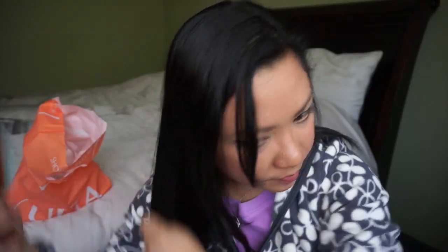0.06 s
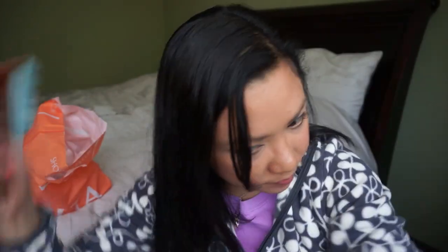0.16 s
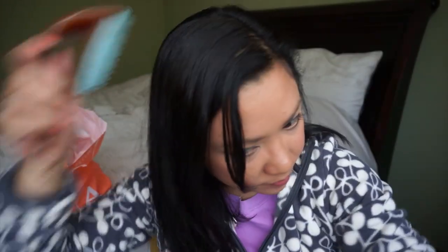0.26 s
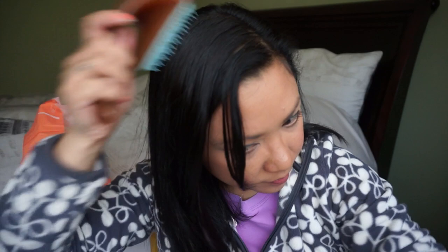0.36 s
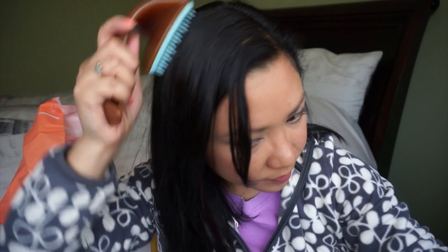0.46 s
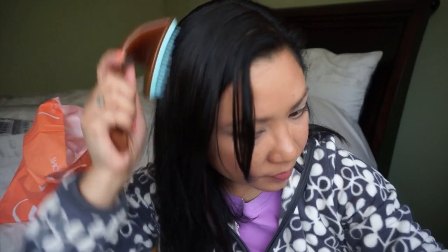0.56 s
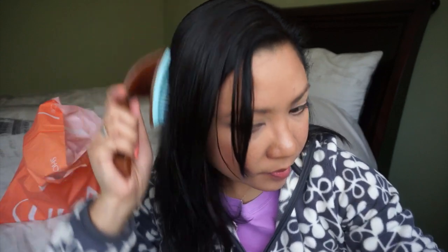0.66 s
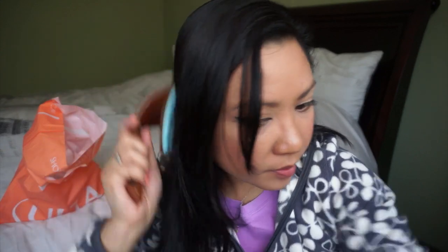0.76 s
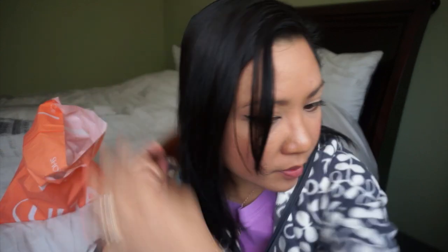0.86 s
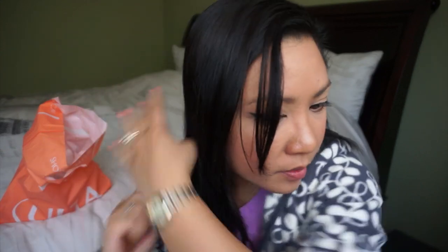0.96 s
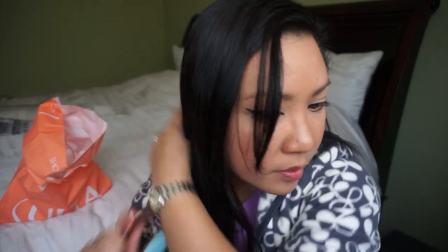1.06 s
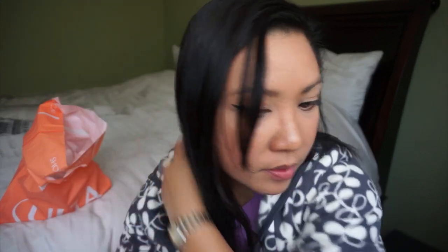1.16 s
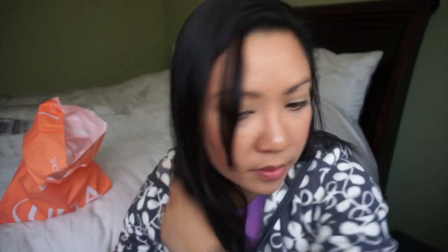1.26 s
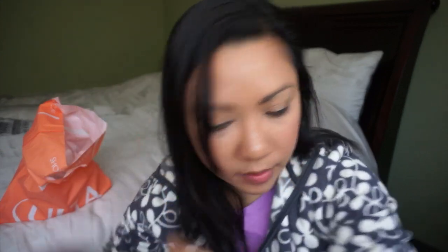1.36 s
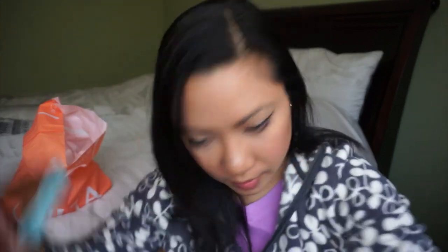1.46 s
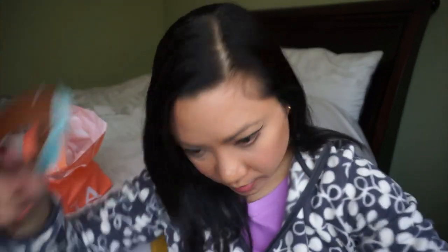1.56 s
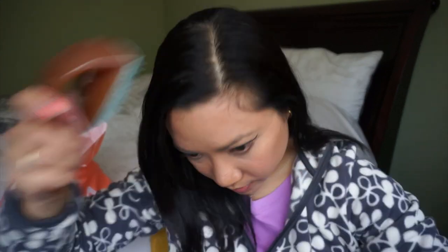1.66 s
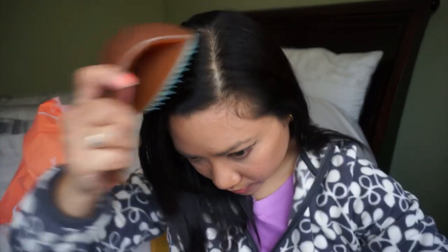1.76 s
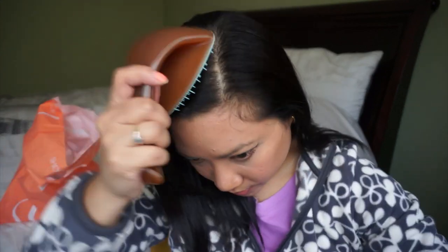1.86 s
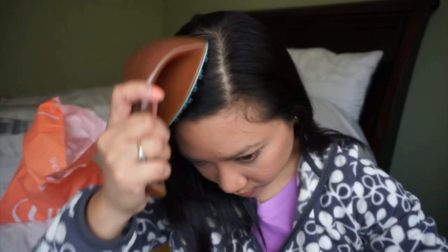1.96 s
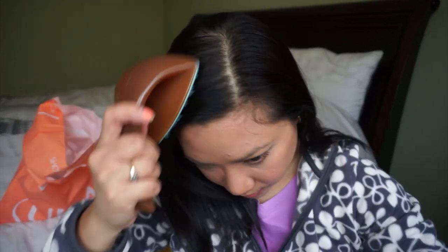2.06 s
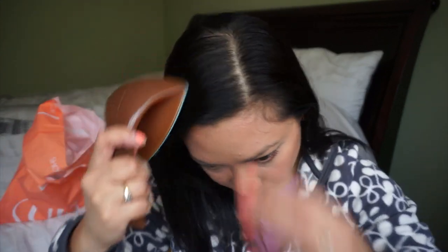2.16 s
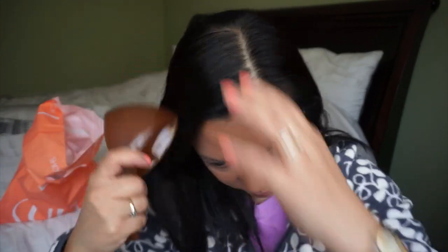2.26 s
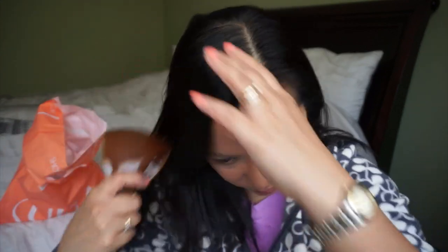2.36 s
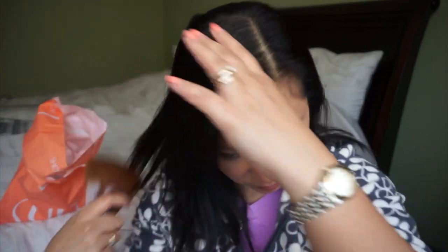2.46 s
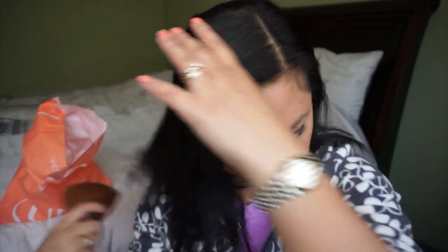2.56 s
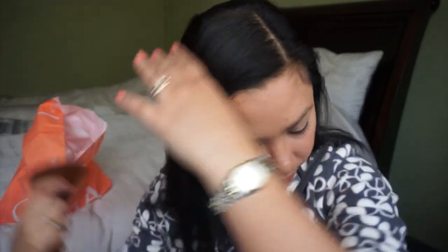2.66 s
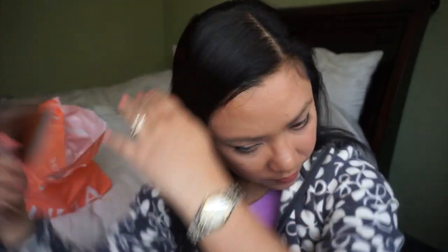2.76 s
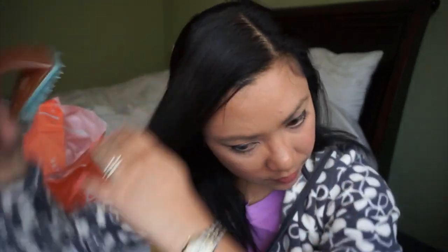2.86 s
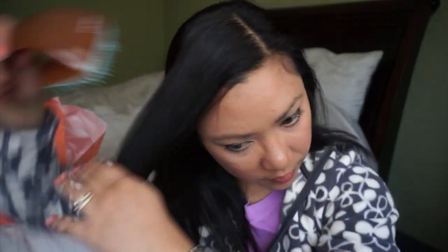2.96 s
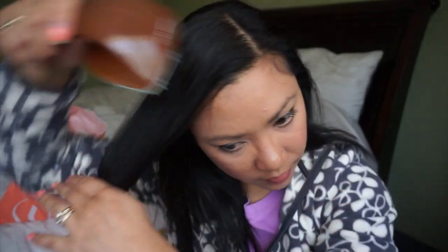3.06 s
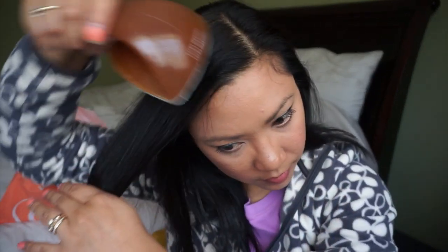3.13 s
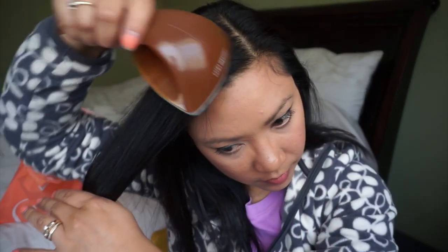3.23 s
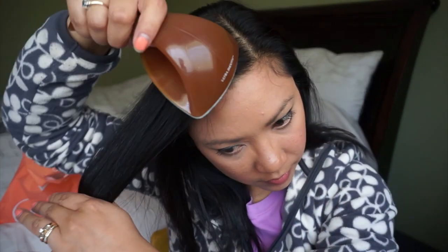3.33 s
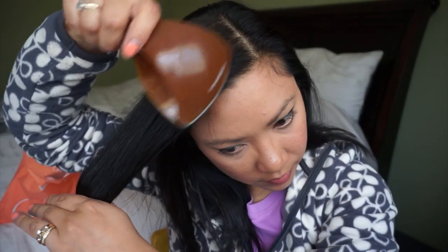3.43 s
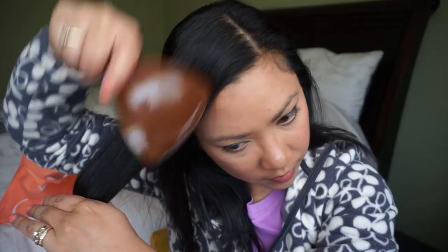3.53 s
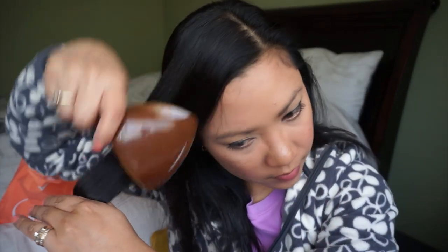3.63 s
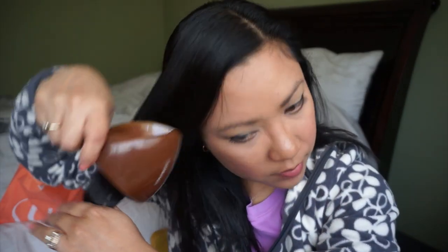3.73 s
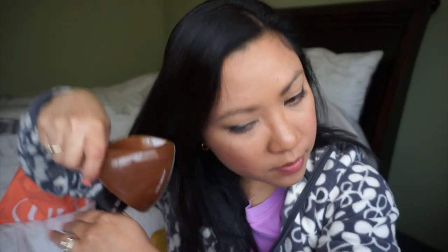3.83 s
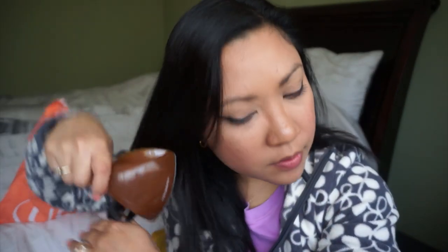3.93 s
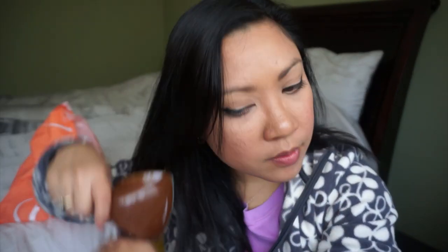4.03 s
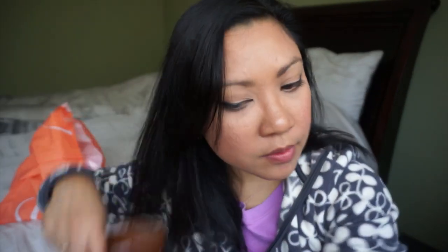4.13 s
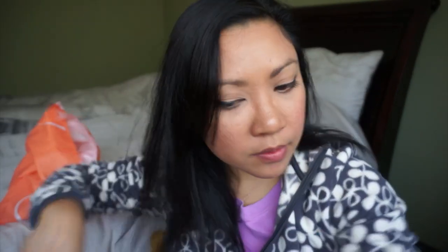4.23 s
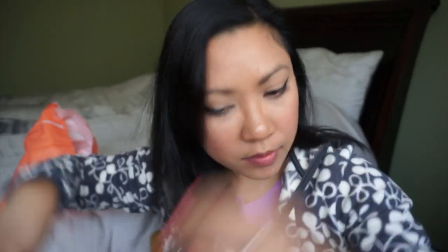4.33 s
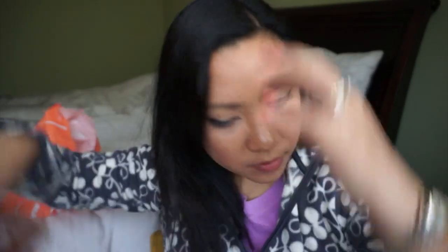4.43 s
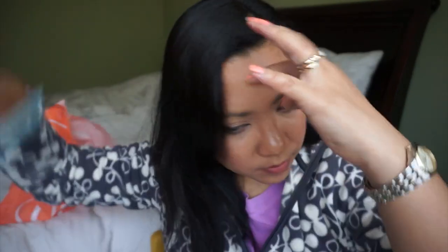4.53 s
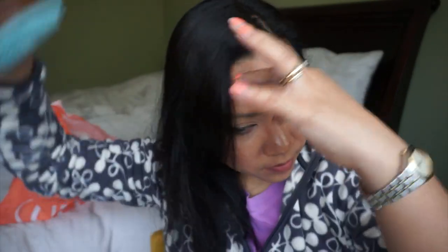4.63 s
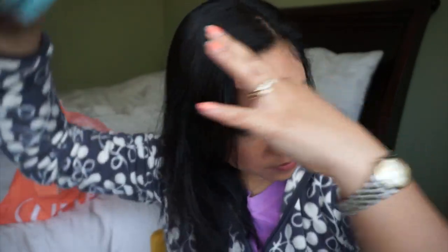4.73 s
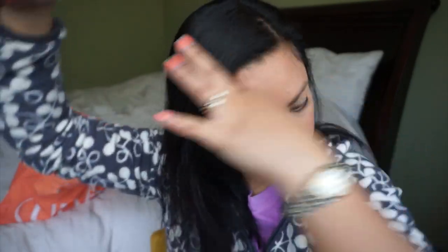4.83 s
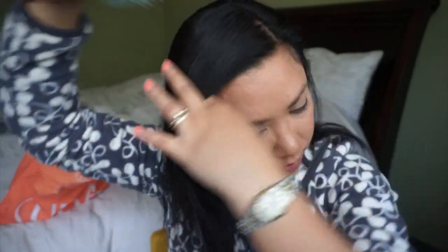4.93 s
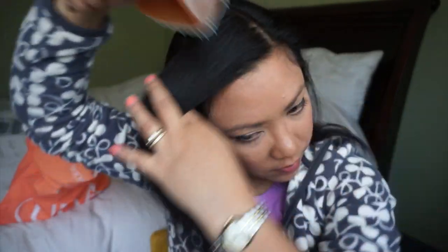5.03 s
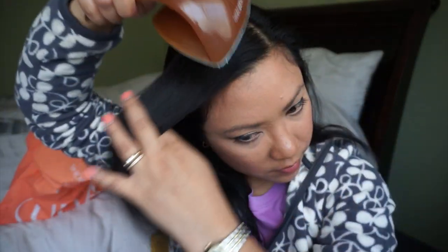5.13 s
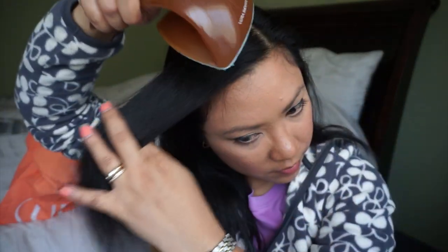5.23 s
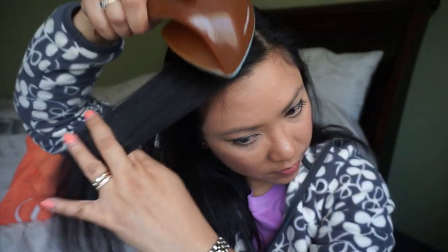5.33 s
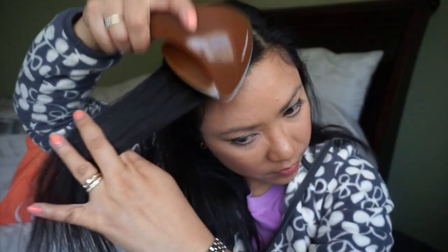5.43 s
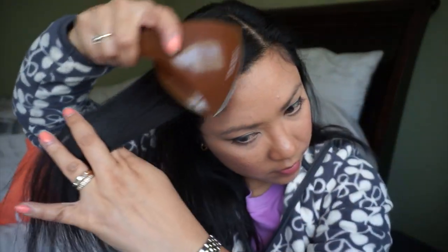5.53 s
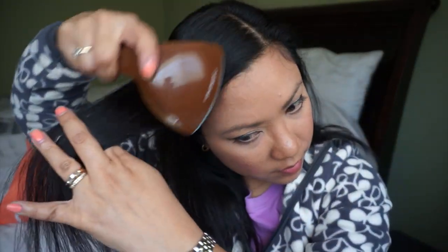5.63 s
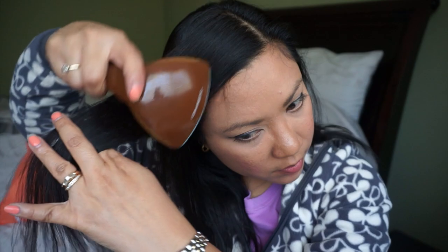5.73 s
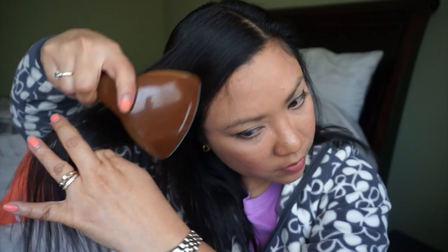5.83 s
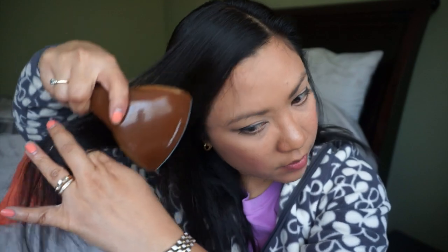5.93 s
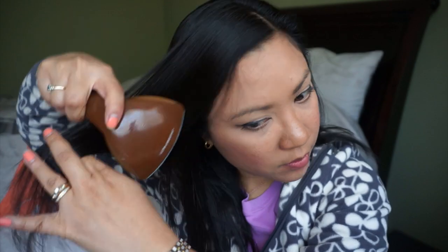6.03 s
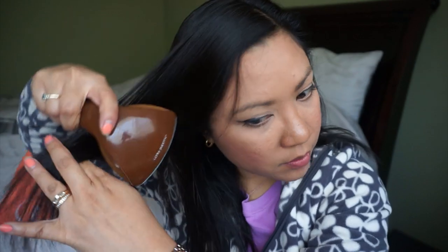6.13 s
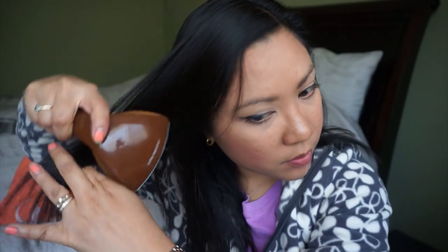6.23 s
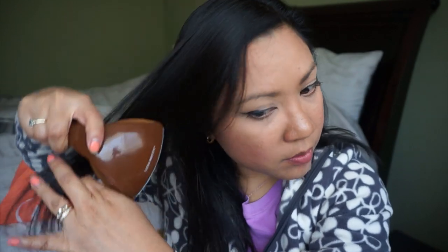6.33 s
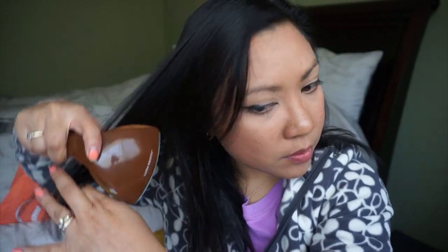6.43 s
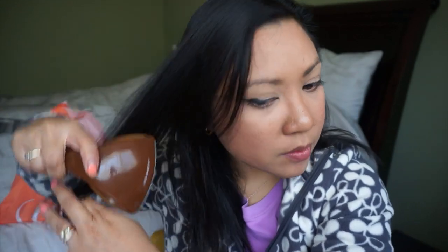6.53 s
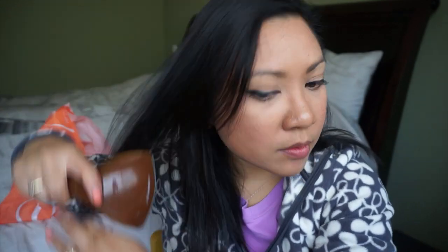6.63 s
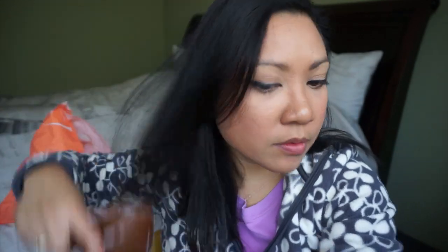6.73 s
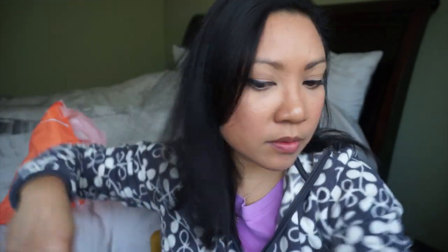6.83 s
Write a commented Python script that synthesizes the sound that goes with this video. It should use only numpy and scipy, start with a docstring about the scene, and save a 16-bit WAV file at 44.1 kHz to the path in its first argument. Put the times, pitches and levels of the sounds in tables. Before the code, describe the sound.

Close, rasping strokes of a hairbrush through dry hair, with short plastic clacks between them over a faint steady hiss.

```python
"""A quiet bedroom, a small stereo camera close to long dry hair: four strokes of a cushioned plastic brush.
At 0.5 s and 2 s the pins land and rasp over the scalp, catching and ringing the hollow cushion.
From 3.5 s they comb the lengths; strands hiss as they slip free and the brush clacks clear near 4 s.
The free hand smooths the hair, then a long last stroke runs from 5.5 s to a clack at 6.8 s.
A faint, steady hiss lies under it all."""
import sys
import numpy as np
from scipy import signal
from scipy.fft import rfft, irfft
from scipy.io import wavfile

SR = 44100
rng = np.random.default_rng(int(sys.argv[2]) if len(sys.argv) > 2 else 0)


def wav_out(sig):
    """Save sig, one row per channel (or a flat mono array), as 16-bit PCM at SR to the path in sys.argv[1]."""
    wavfile.write(sys.argv[1], SR, np.round(np.clip(np.atleast_2d(sig).T, -1, 1) * 32767).astype(np.int16))


N = 303661
TIME = np.arange(N) / SR

# pins pulled over the scalp: start_s, length_s, level_db, swell_db_per_s, rest_before_s, hiss_offset_db
SCALP_STROKES = [(0.5, 0.29, -39.5, -4.5, 0.083, -9.5), (2.023, 0.18, -43.5, 11.5, 0.12, -32)]
# pins drawn down a taut lock: start_s, length_s, level_db, swell_db_per_s, start_hz, hiss_offset_db
COMB_STROKES = [(3.515, 0.032, -49, 20, 1020, -2), (3.622, 0.36, -51.5, 4, 1060, -2.5),
                (5.563, 0.522, -47, -2, 974, -7.5), (6.113, 0.625, -52, -9, 1170, -2.5)]
# hanging hair tugs at the cushion: start_s, length_s, level_db, swell_db_per_s, pin_offset_db
CUSHION_TUGS = [(0.874, 0.14, -43.5, -36, -1.5), (1.079, 0.055, -46, 97, -9.5), (2.359, 0.17, -51, 12, 8.5),
                (3.689, 0.26, -57.5, 3, -11), (3.962, 0.17, -48, -7, -4), (6.57, 0.203, -66.5, 42, 17.5)]
COMB_FADES_S, TUG_FADES_S = (0.072, 0.11), (0.11, 0.08)  # attack, release


def scalp_rasp(start_hz=710, rise_hz_per_s=1700):
    """Pin tips chatter over the scalp: a full, low rasp whose resonance climbs as the brush slides."""
    # spectrum of the rasp: frequency_hz, gain_db
    spectrum = [(100, -52), (250, -33.5), (350, -26.5), (450, -3.5), (680, -0.5), (850, -8.5), (1100, -1),
                (1380, -8.5), (1900, -0.5), (2500, -3), (3200, -7.5), (4200, -11.5), (6500, -21.5),
                (11000, -23.5)]
    gap_hz = climb([(s, length_s, start_hz) for s, length_s, *_ in SCALP_STROKES], rise_hz_per_s)
    slips = friction(slips_per_s=7000, spread_db=1.5, catch_hz=85, catch_db=1.3)
    gap_slips = friction(slips_per_s=6000, spread_db=3, catch_hz=70, catch_db=1.6)
    gap = ring(gap_slips, gap_hz, width_hz=420)
    rasp = unit_rms(colour(slips, spectrum) + undb(1) * gap, (800, 2000))
    return rasp * scalp_drag(SCALP_STROKES) * undb(-1)


def combing(rise_hz_per_s=290, top_hz=1138):
    """Taut hair runs between the pins; the air gap under the brush resonates and shifts as it travels."""
    # spectrum of hair on the pins: frequency_hz, gain_db
    spectrum = [(120, -37), (340, -30.5), (480, -6), (640, -9.5), (900, -10.5), (1430, -16.5), (1850, -2),
                (2150, -3.5), (2450, 2), (3000, -9), (4500, -18.5), (11000, -57)]
    sweeps = [(s, length_s, hz) for s, length_s, _, _, hz, _ in COMB_STROKES]
    gap_hz = np.minimum(climb(sweeps, rise_hz_per_s), top_hz)
    slips = friction(slips_per_s=5000, spread_db=2, catch_hz=150, catch_db=1.5)
    gap_slips = friction(slips_per_s=2700, spread_db=5, catch_hz=49, catch_db=0)
    gap = ring(gap_slips, gap_hz, width_hz=330)
    rasp = unit_rms(colour(slips, spectrum) + undb(2) * gap, (850, 1300))
    return rasp * gesture(COMB_STROKES, *COMB_FADES_S) * undb(-3.5)


def cushion(slack_hz=612, rise_hz_per_s=280, pin_hz=2380, pin_fade_db_per_s=58):
    """Off the head, tugged pins ring and boom in the hollow cushion, whose pitch rises with the pull."""
    cushion_hz = climb([(s, length_s, slack_hz) for s, length_s, *_ in CUSHION_TUGS], rise_hz_per_s)
    pull = gesture(CUSHION_TUGS, *TUG_FADES_S)
    # the pins ring less as the hair tightens round them
    pin_tugs = [(s, length_s, db + pin_db, swell - pin_fade_db_per_s)
                for s, length_s, db, swell, pin_db in CUSHION_TUGS]
    slips = friction(slips_per_s=2200, spread_db=3, catch_hz=70, catch_db=3.5)
    boom = unit_rms(ring(slips, cushion_hz, width_hz=250), (480, 760))
    pins = unit_rms(ring(slips, pin_hz, width_hz=750), (2200, 2800))
    return undb(-3.5) * boom * pull + undb(-5) * pins * gesture(pin_tugs, *TUG_FADES_S)


def scratchy_thumps(ring_s=0.0063, scratch_s=0.0039, rise_s=0.0012):
    """Short scratchy thumps: pins landing, catching or letting go, and a crackle under the hand."""
    # brief contacts: start_s, level_db, pitch_hz, scratch_db
    contacts = [(0.419, -45, 496, -0.5), (0.822, -37, 1275, -3), (0.961, -28.5, 636, -35),
                (1.070, -43, 610, 0), (1.125, -28.5, 690, -2.5), (1.907, -47, 666, 0),
                (2.197, -32, 1020, -11), (2.22, -33, 980, -2.5), (2.52, -40, 643, -12),
                (3.298, -58, 1040, -4), (3.464, -49, 1040, -19), (3.493, -36.5, 937, -10.5),
                (3.523, -37, 890, -9), (3.536, -34.5, 1093, -9.5), (3.55, -38, 1105, -2),
                (4.425, -43, 1160, -20), (5.469, -55.5, 1000, 3.5), (5.476, -44.5, 1050, -0.5)]
    # spectrum of the scratch: frequency_hz, gain_db
    spectrum = [(60, -45), (200, -31), (500, -1.5), (1400, 8), (2200, 9.5), (3200, 3), (6000, -9),
                (11000, -8.5)]
    out, t = np.zeros(N), TIME[:4096]
    for s, db, hz, scratch_db in contacts:
        flex = np.sin(2 * np.pi * hz * t) * np.exp(-t / ring_s) * (1 - np.exp(-t / rise_s))
        thump = np.gradient(flex, t) / (2 * np.pi * hz)
        scratch = colour(rng.standard_normal(len(t)) * np.exp(-t / scratch_s), spectrum)
        add(out, s, undb(db) * (1.44 * thump + undb(scratch_db + 4.5) * scratch))
    return out


def rebounds(hits, scatter_octaves=0.44):
    """Each hit becomes a knock and two weaker rebounds, which ring at scattered pitches."""
    knocks = []
    for s, db, hz, treble_db, gap_s, rebound_db in hits:
        for k in range(3):
            octaves = scatter_octaves * rng.standard_normal() * (k > 0)
            knocks.append((s + k * gap_s, db + k * rebound_db, hz * 2 ** octaves, treble_db))
    return knocks


def clacks(tick_s=0.00076, shell_s=0.0009, damping=0.61):
    """Hard plastic is knocked as the brush snaps free or is handled: a sharp tick, a very short ring."""
    # hits on the shell: start_s, level_db, pitch_hz, treble_db, rebound_gap_s, rebound_step_db
    hits = [(0.4183, -32, 2130, -2, 0.004, -5), (1.1196, -24, 2830, -16, 0.003, -20),
            (1.1255, -19, 2440, -2, 0.0057, -5), (1.1382, -23, 4570, 8, 0.004, -15),
            (1.335, -41.5, 1840, -12, 0.0089, -6), (3.9737, -16, 1970, -2.5, 0.009, -8.5),
            (3.993, -24, 2190, 4, 0.006, -1), (4.0564, -26, 2500, 1, 0.0093, -1.5),
            (4.1124, -21.5, 2430, 10, 0.006, -3.5), (4.2843, -29, 4330, 2.5, 0.0062, -5.5),
            (4.5871, -37.5, 1750, -9, 0.004, -2), (4.719, -41.5, 1620, -19, 0.005, -5),
            (4.829, -35.5, 3700, 4, 0.0075, -2), (6.8096, -21.5, 2660, 3.5, 0.0055, -5)]
    # spectrum of the tick: frequency_hz, gain_db
    spectrum = [(60, -34), (250, -28), (700, -16), (2000, 5), (7000, 12), (11000, 14.5)]
    out, t = np.zeros(N), TIME[:2048]
    for s, db, hz, treble_db in rebounds(hits):
        shell_noise, tick_noise = rng.standard_normal((2, len(t)))
        shell = ring(shell_noise * np.exp(-t / shell_s), hz, width_hz=damping * hz)
        tick = colour(tick_noise * np.exp(-t / tick_s), spectrum)
        clack = shell / np.linalg.norm(shell) + undb(treble_db) * tick / np.linalg.norm(tick)
        add(out, s, undb(db + 14.5) * clack / np.linalg.norm(clack))
    return out


def strands():
    """Dry strands rub and slip off the pins: a fine, bright crackle in every stroke and as hair falls."""
    # spectrum of the strands: frequency_hz, gain_db
    spectrum = [(100, -40), (300, -21.5), (500, -2.5), (900, -2), (1300, 1.5), (2200, 4), (3000, 4),
                (4000, 1), (7000, -1), (11000, -2.5)]
    # loose hair slides and falls: start_s, length_s, level_db, swell_db_per_s
    swishes = [(0.0, 0.25, -62.5, -10), (1.25, 0.13, -59, -10), (2.26, 0.12, -54.5, -16),
               (2.86, 0.059, -60, -26), (4.22, 0.24, -52.5, -3), (5.8, 0.19, -52.5, -5),
               (6.68, 0.15, -51.5, 22)]
    # brief bright hiss, hair ends flicking free or a sleeve crinkling:
    # start_s, length_s, level_db, swell_db_per_s
    bursts = [(1.128, 0.021, -42, -60), (3.84, 0.12, -48.5, 33), (3.98, 0.17, -38.5, -15.5),
              (4.26, 0.07, -57, 2), (4.835, 0.014, -53.5, -53)]
    slips = friction(slips_per_s=12000, spread_db=2.5, catch_hz=160, catch_db=0.98)
    hiss = unit_rms(colour(slips, spectrum), (5000, 11000))
    motions = [scalp_drag(at_hiss_level(SCALP_STROKES)),
               gesture(at_hiss_level(COMB_STROKES), *COMB_FADES_S),
               gesture(CUSHION_TUGS, *TUG_FADES_S) * undb(-8.5),
               gesture(swishes, attack_s=0.35, release_s=0.65),
               gesture(bursts, attack_s=0.017, release_s=0.089)]
    return hiss * np.linalg.norm(motions, axis=0) * undb(-4)


def palm():
    """The free hand and its sleeve rustle as they smooth the hair."""
    # passes of the hand: start_s, length_s, level_db, swell_db_per_s
    passes = [(0.0, 0.18, -57.5, -1), (1.22, 0.11, -54.5, -7), (2.64, 0.4, -62.5, -13),
              (3.295, 0.015, -62.5, 0), (4.22, 0.34, -49, 10), (4.72, 0.36, -57.5, -16)]
    # spectrum of the rustle: frequency_hz, gain_db
    spectrum = [(100, -28.5), (300, -11.5), (900, -7.5), (1200, 1.5), (1800, 0), (3000, -4.5), (4800, -7.5),
                (7000, -12.5), (11000, -34)]
    slips = friction(slips_per_s=4000, spread_db=4, catch_hz=80, catch_db=3.5)
    rustle = unit_rms(colour(slips, spectrum), (1100, 3000))
    return rustle * gesture(passes, attack_s=0.08, release_s=0.19) * undb(-7.5)


def bumps(push_s=0.00076):
    """Soft, low thuds of the brush against the body: one short push each."""
    # contacts with head, hand or shoulder: start_s, level_db
    contacts = [(0.42, -60.5), (1.07, -61), (1.124, -53), (3.971, -61)]
    # spectrum of the thud: frequency_hz, gain_db
    spectrum = [(25, -20), (50, -14), (85, -4.5), (160, -2), (300, 1), (800, -37), (3000, -29)]
    out = np.zeros(N)
    thud = colour(np.exp(-TIME[:4096] / push_s), spectrum)
    for s, db in contacts:
        add(out, s, undb(db) * thud / np.abs(thud).max())
    return out


def bedroom(x, t60_s=0.35, onset_s=0.006):
    """The short, soft reverberation of a furnished room."""
    t = TIME[:SR // 2]
    tail = rng.standard_normal(len(t)) * np.exp(-np.log(1000) * t / t60_s) * (1 - np.exp(-t / onset_s))
    return signal.oaconvolve(x, tail / np.linalg.norm(tail))[:N]


def room_tone():
    """A faint, steady hiss reaches the microphone from all sides."""
    # spectrum of the hiss: frequency_hz, gain_db
    spectrum = [(25, -16), (60, -19.5), (150, -7), (300, -2), (600, 4.5), (1000, 4.5), (1450, 7), (2400, 4),
                (4000, 3.5), (11000, 2.5)]
    # its stereo width: frequency_hz, side_to_mid_db
    width = [(100, -14), (500, -1.5), (1200, -1.5), (2500, -4.5), (5000, -13.5), (9000, -44)]
    mid, side = (unit_rms(colour(rng.standard_normal(N), spectrum), (100, 11000)) for _ in range(2))
    side = colour(side, width)
    return np.array([undb(-62.5) * (mid + side), undb(-61.9) * (mid - side)])


def friction(slips_per_s, spread_db, catch_hz, catch_db):
    """Tiny slips of unequal size, swelling and sinking as the strands catch and let go."""
    slips = (rng.random(N) < slips_per_s / SR) * rng.choice([-1, 1], N)
    sizes = undb(spread_db * np.minimum(rng.exponential(size=N), 4))
    catching = wander(catch_hz) + .5 * wander(catch_hz / 5)
    return slips * sizes * undb(catch_db * catching)


def wander(rate_hz):
    """A random drift with a spread near 1, turning rate_hz times a second."""
    return 1.2 * np.interp(TIME * rate_hz, np.arange(N // 20), rng.standard_normal(N // 20))


def gesture(rows, attack_s, release_s):
    """Gain of hand movements that rise, swell steadily and die away; attack and release span 20 dB."""
    t = TIME[::32]
    power = np.zeros(len(t))
    for s, length_s, db, swell_db_per_s, *_ in rows:
        held_s = np.clip(t - s, 0, length_s)
        fade = np.maximum(s - t, 0) / attack_s + np.maximum(t - s - length_s, 0) / release_s
        power += undb(db + swell_db_per_s * held_s - 20 * np.minimum(fade, 10)) ** 2
    return np.interp(TIME, t, np.sqrt(power))


def scalp_drag(rows, landing_s=0.017, light_contact_db=-11):
    """Gain of pins that land and rest lightly on the head before the pull begins."""
    resting = [(s - rest_s, rest_s, db + light_contact_db, 0) for s, _, db, _, rest_s, _ in rows]
    return np.hypot(gesture(resting, landing_s, landing_s), gesture(rows, attack_s=0.048, release_s=0.18))


def at_hiss_level(rows):
    """The same strokes at the level of their strand hiss, offset by the last column."""
    return [(s, length_s, db + rest[-1], *rest) for s, length_s, db, *rest in rows]


def climb(rows, rise_hz_per_s):
    """A pitch that starts afresh with each movement (start_s, length_s, start_hz) and rises steadily."""
    points = [(s + t, hz + rise_hz_per_s * t) for s, length_s, hz in rows for t in (0, length_s)]
    return np.interp(TIME, *np.transpose(sorted(points)))


def ring(x, hz, width_hz):
    """A steep-sided resonance whose centre may move: shift it to 0 Hz, smooth twice, shift back."""
    turn = np.exp(2j * np.pi * np.cumsum(hz * np.ones(len(x))) / SR)
    pole = np.exp(-np.pi * width_hz / SR)
    smooth = signal.lfilter([(1 - pole) ** 2], np.poly([pole, pole]), x / turn)
    # a small body radiates little below its resonance
    return signal.lfilter(*signal.butter(2, np.mean(hz) / 2, "high", fs=SR), 2 * np.real(smooth * turn))


def colour(x, points, size=2048):
    """Minimum-phase filter through (frequency_hz, gain_db) points, joined on a log-frequency axis."""
    hz, db = np.transpose(points)
    bins_hz = np.fft.rfftfreq(size, 1 / SR)
    gain = undb(np.interp(np.log(bins_hz + 1), np.log(hz), db))
    cepstrum = irfft(np.log(gain))
    cepstrum[1:size // 2] *= 2
    cepstrum[size // 2 + 1:] = 0
    return signal.oaconvolve(x, irfft(np.exp(rfft(cepstrum))))[:len(x)]


def undb(db):
    """Decibels to gain."""
    return 10 ** (np.asarray(db) / 20)


def unit_rms(x, band_hz):
    """Scale to rms 1 inside a band."""
    return x / np.std(signal.sosfilt(signal.butter(4, band_hz, "band", fs=SR, output="sos"), x))


def add(track, s, sound):
    """Mix a short sound in at time s."""
    start = int(s * SR)
    track[start:start + len(sound)] += sound[:N - start]


def mic_pair(x, width, scatter_s=0.0098):
    """Two close microphone ports hear nearly the same; near reflections set them slightly apart."""
    t = TIME[:4096]
    scatter = rfft(rng.standard_normal(len(t)) * np.exp(-t / scatter_s))
    reflections = colour(irfft(scatter / np.abs(scatter)), width)
    side = signal.oaconvolve(x, reflections)[:N]
    return np.array([x + side, x - side])


def lean(pair, points):
    """Tilt the balance of a stereo pair by (frequency_hz, left_minus_right_db) points."""
    return np.array([colour(x, [(hz, sign * db / 2) for hz, db in points])
                     for x, sign in zip(pair, (1, -1))])


def scene():
    """Close brushing and clacks in the bedroom, a little off the microphone's axis, over room tone."""
    # stereo width of the brush at the head: frequency_hz, side_to_mid_db
    brush_width = [(300, -13), (1100, -21.5), (2200, -70), (4000, -33), (9000, -17)]
    # stereo width of loose hair, sleeve and reverberation: frequency_hz, side_to_mid_db
    loose_width = [(100, -10.5), (1200, -9.5), (2500, -13), (4500, -10.5), (6800, -19.5), (9000, -29.5)]
    # stereo width of the hard shell: frequency_hz, side_to_mid_db
    shell_width = [(500, -9), (1200, -16), (2400, -15.5), (4500, -6), (7000, -9), (9000, -40)]
    # the shell beams its clicks unevenly: frequency_hz, left_minus_right_db
    shell_balance = [(1000, 0.51), (2400, 2.4), (4500, 2.1), (8000, 0.58)]
    # off-axis balance at the microphone: frequency_hz, left_minus_right_db
    mic_balance = [(100, 0), (600, -1.5), (1350, -0.6), (2300, 1.5), (5000, 1.4), (9000, 0.16)]
    brush = scalp_rasp() + combing() + cushion() + scratchy_thumps() + bumps()
    loose = strands() + palm()
    clicks = clacks()
    room = bedroom(undb(-9.5) * brush + undb(-13.5) * loose + undb(-6) * clicks)
    beamed = lean(mic_pair(clicks, shell_width, scatter_s=0.002), shell_balance)
    at_mic = mic_pair(brush, brush_width) + mic_pair(loose + room, loose_width) + beamed
    return lean(at_mic, mic_balance) + room_tone()


def record(dry, low_hz=55, top_hz=11020):
    """The camera cuts the deep bass and the top octave."""
    thin = signal.sosfilt(signal.butter(2, low_hz, "high", fs=SR, output="sos"), dry)
    return signal.sosfilt(signal.ellip(12, .2, 70, top_hz, fs=SR, output="sos"), thin)


dry = scene()
out = record(dry)
wav_out(out)
```